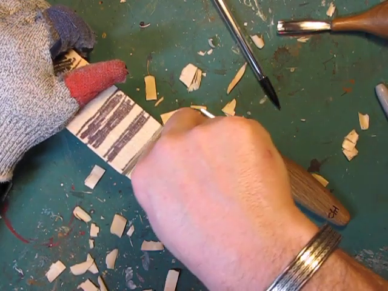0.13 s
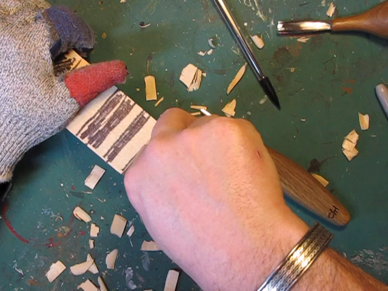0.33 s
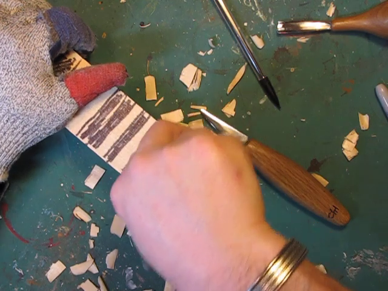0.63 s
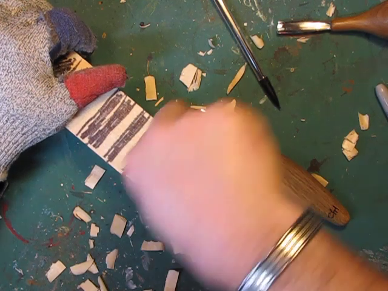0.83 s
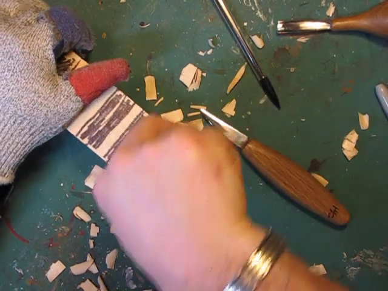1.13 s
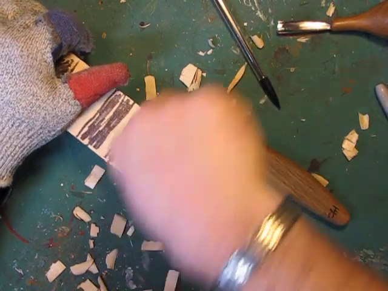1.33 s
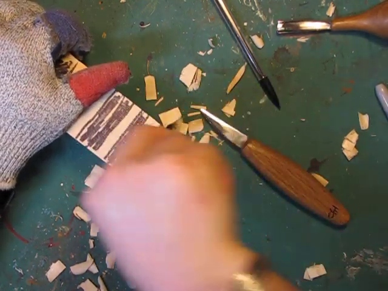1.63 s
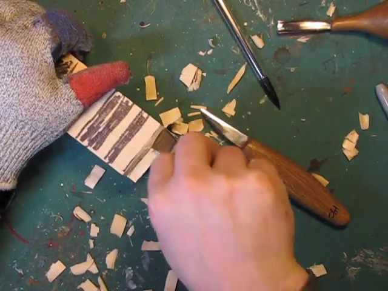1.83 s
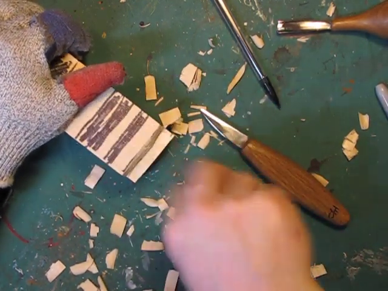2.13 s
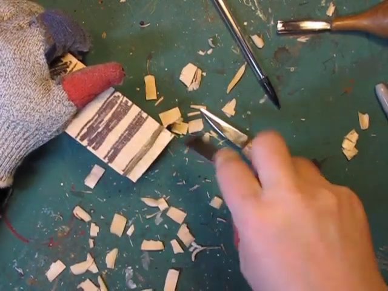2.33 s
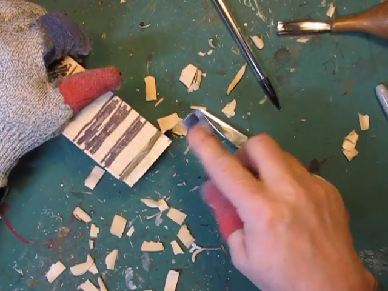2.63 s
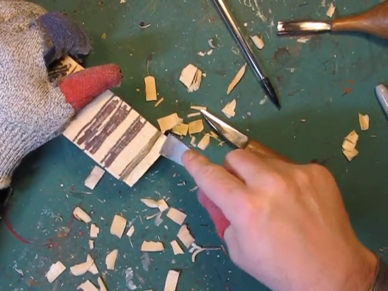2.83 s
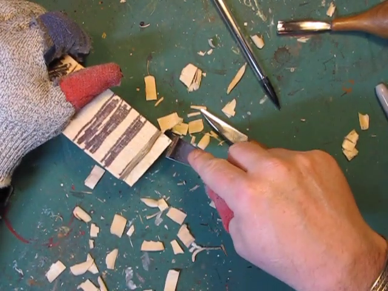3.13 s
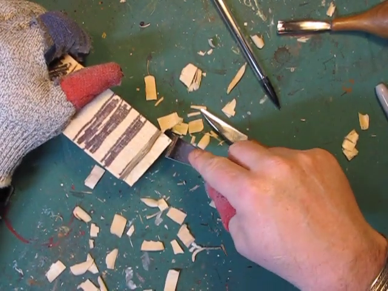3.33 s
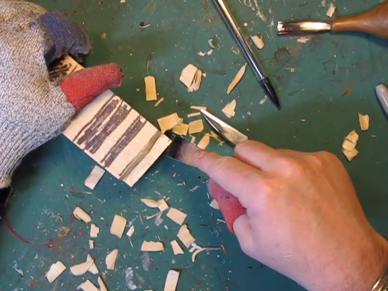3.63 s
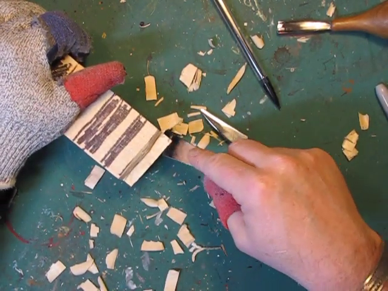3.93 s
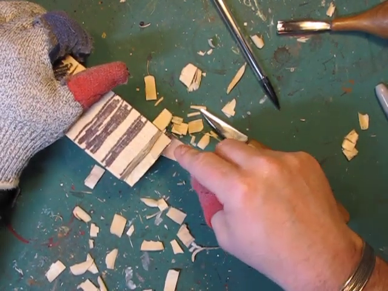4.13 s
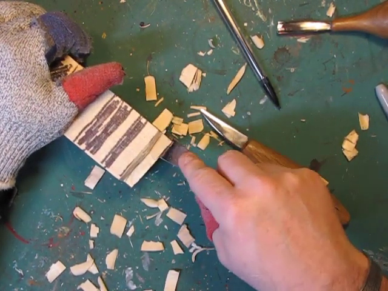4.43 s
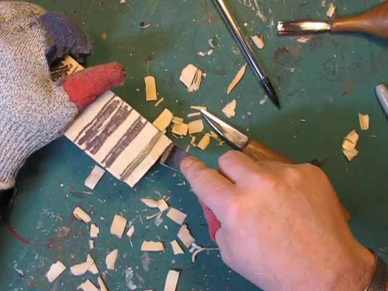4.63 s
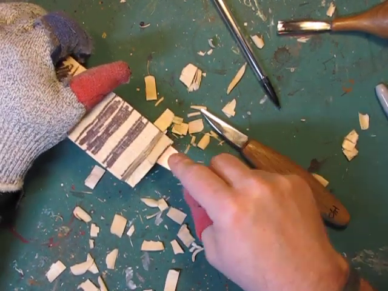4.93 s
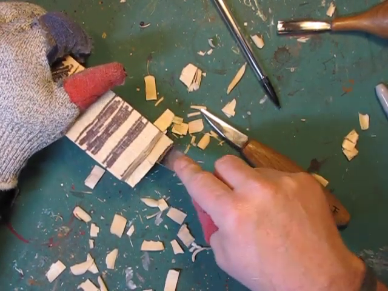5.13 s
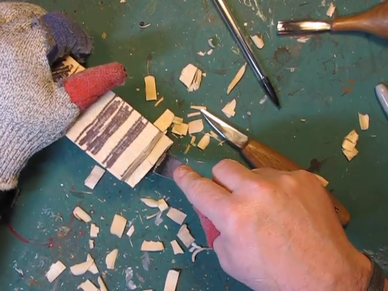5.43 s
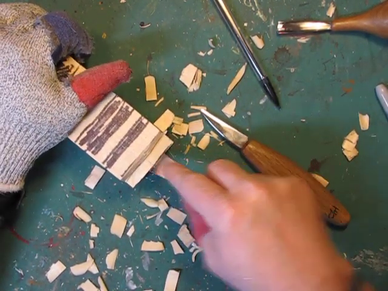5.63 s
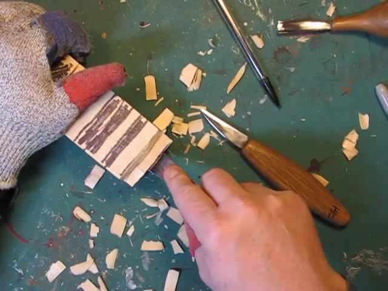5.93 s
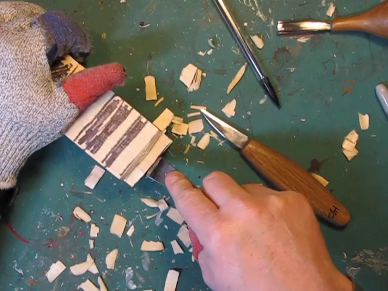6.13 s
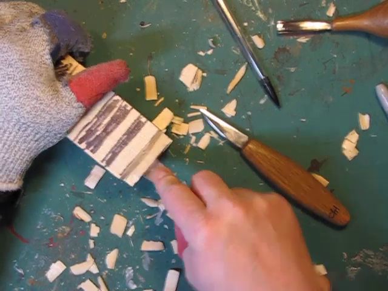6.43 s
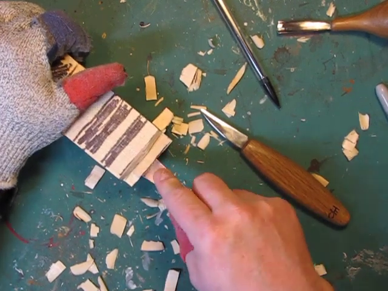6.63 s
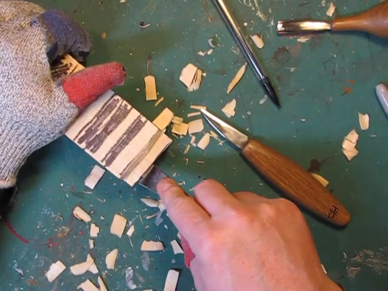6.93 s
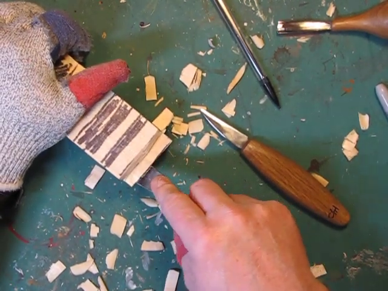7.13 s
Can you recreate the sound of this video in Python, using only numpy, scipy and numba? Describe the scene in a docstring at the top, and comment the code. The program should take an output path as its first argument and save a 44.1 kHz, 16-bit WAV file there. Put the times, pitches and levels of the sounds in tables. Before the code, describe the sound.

A hand gouge pares a wood block on a workbench in a small room, heard up close. It starts with a run of short, crackly rasps, small clicks and light knocks. Then the cuts spread out, with quiet scraping between sharp snaps as chips break loose, each big one thumping the bench. The tool clinks faintly now and then, and a last cut crackles at the end. A low hum runs underneath.

```python
"""Rasping cuts, sharp snaps and knocks over a low hum: a gouge pares a wood block on a bench in a small room.
Fibres tear in dense tiny clicks that resonate in block, chip and blade; chips snap loose.
Each jolt sets the bench top and frame ringing; the tool clinks and drags faintly.
A motor hums and winds down over mains hum and room air."""
import sys
import numpy as np
from scipy import signal
from scipy.fft import rfft, irfft, next_fast_len
from scipy.io import wavfile
from scipy.ndimage import uniform_filter1d
from numba import njit

SR = 44100
rng = np.random.default_rng(int(sys.argv[2]) if len(sys.argv) > 2 else 0)


def pcm_store(signal):
    """Save signal as 16-bit PCM."""
    levels = np.round(np.clip(np.atleast_2d(signal), -1, 1) * 32767)
    wavfile.write(sys.argv[1], SR, levels.astype(np.int16).T)


N = 321048

# bench top modes: (frequency [Hz], level [dB], t60 [s])
BENCH_MODES = [(95.5, -7.5, 0.12), (120, -3.5, 0.32), (157, -3.5, 0.057), (197.1, 0.5, 0.21),
               (236, -24.5, 0.061), (266.5, -17.5, 0.2), (331.6, -8, 0.12), (363, -12.5, 0.13),
               (439, -8, 0.055), (520, -7.5, 0.079), (684, 2.5, 0.012), (937, -1, 0.015),
               (1180, -1.5, 0.0084)]
# steel edge modes: (frequency [Hz], width [Hz], level [dB])
BLADE_MODES = [(4400, 400, -2), (8400, 600, 7), (11700, 700, 5), (15000, 900, -2)]
# how freely the steel rings: (time [s], level [dB])
BLADE_FREEDOM = [(0, -4), (1.9, -8), (2.4, -20), (4.74, -8), (4.79, -10.5), (5.4, -1), (6.3, 8),
                 (7.28, 2.5)]
BENCH_SPLIT_HZ, GRAINS_PER_S = 220, 6500


def amp(db):
    """Decibels to gain."""
    return 10 ** (np.asarray(db) / 20)


def unit_rms(x):
    """Scale to unit rms."""
    return x / np.sqrt(np.mean(x ** 2) + 1e-20)


def in_time(rows):
    """Table columns as curves over the samples."""
    times_s, *columns = np.transpose(rows)
    return np.array([np.interp(np.arange(N) / SR, times_s, c) for c in columns])


def at_hz(rows, hz, column=1):
    """One column of a spectrum table, on a log frequency axis."""
    rows = np.array(rows)
    return np.interp(np.log(hz), np.log(rows[:, 0]), rows[:, column])


def ring(x, hz, t60_s):
    """One mode: a unit click starts a decaying sine of height 1."""
    r, w = amp(-60 / (t60_s * SR)), 2 * np.pi * hz / SR
    return signal.lfilter([0, np.sin(w)], [1, -2 * r * np.cos(w), r * r], x + 1e-18)


def body(x, modes):
    """Parallel resonances with alternating signs."""
    out = 0
    for k, (hz, width_hz, db) in enumerate(modes):
        r = np.exp(-np.pi * width_hz / SR)
        b = [(1 - r * r) / 2, 0, (r * r - 1) / 2]
        a = [1, -2 * r * np.cos(2 * np.pi * hz / SR), r * r]
        out = out + (-1) ** k * amp(db) * signal.lfilter(b, a, x + 1e-18)
    return out


@njit
def two_pole_twice(x, feedback, r):
    """Time-varying band-pass, run twice for steep flanks."""
    for _ in range(2):
        y = np.zeros(len(x))
        for i in range(2, len(x)):
            y[i] = (1 - r[i] ** 2) / 2 * (x[i] - x[i - 2]) + feedback[i] * y[i - 1] - r[i] ** 2 * y[i - 2]
        x = y
    return x


def moving_resonance(x, hz, width_hz):
    """Resonance whose centre and width follow curves."""
    r = np.exp(-np.pi * width_hz / SR) * np.ones(N)
    return two_pole_twice(x, 2 * r * np.cos(2 * np.pi * hz / SR), r)


def grains(per_s, spread_db):
    """Random clicks of uneven size and sign over a little noise."""
    sizes = amp(spread_db * np.minimum(rng.exponential(1, N), 4)) * rng.choice([-1, 1], N)
    clicks = sizes * (rng.random(N) < per_s / SR)
    return unit_rms(clicks + 0.11 * rng.standard_normal(N))


def clumps(per_s, depth_db):
    """Uneven wood grain: a quickly wandering gain."""
    knots = rng.standard_normal(N // 100)
    return amp(depth_db * np.interp(np.arange(N) / SR * per_s, np.arange(len(knots)), knots))


def motor():
    """Two clean partials sink in pitch as the motor slows towards idle."""
    # (time [s], fundamental [dB rms], second partial [dB rms])
    partial_levels = [(0, -38.5, -42), (.5, -41, -79), (1.2, -46, -68), (2.0, -45.5, -57.5),
                      (2.4, -40, -61), (2.8, -43, -57), (3.6, -50, -56.5), (3.9, -47.5, -64),
                      (4.2, -76.5, -58.5), (5.5, -51, -55), (7.28, -65, -67)]
    start_hz, idle_hz, slowing_s = 93.1, 83.0, 3.5
    first_db, second_db = in_time(partial_levels)
    hz = idle_hz + (start_hz - idle_hz) * np.exp(-np.arange(N) / SR / slowing_s)
    phase = 2 * np.pi * np.cumsum(hz) / SR
    return np.sqrt(2) * (amp(first_db) * np.sin(phase) + amp(second_db) * np.sin(2 * phase))


def mains_hum():
    """Wavering hum: noise in very narrow bands."""
    # (frequency [Hz], width [Hz], level [dB rms])
    bands = [(122.2, 2.2, -52.5), (64, 1.54, -56), (232.5, 3.2, -65.5)]
    white = rng.standard_normal(N + SR)
    return sum(amp(db) * unit_rms(body(white, [(hz, width_hz, 0)])[SR:]) for hz, width_hz, db in bands)


def air():
    """Smooth room and preamp noise, alike left and right in the bass only."""
    # (frequency [Hz], relative density [dB])
    spectrum = [(20, 6), (45, -1), (62, -34.5), (80, -1), (150, -8), (250, -12.5), (500, -16),
                (1000, -23.5), (2000, -27.5), (4670, -31), (9000, -37), (16000, -44.5)]
    # (frequency [Hz], left-right coherence [0..1])
    coherence = [(100, 0.82), (290, 0.85), (640, 0.57), (1400, 0.18), (3100, 0.013)]
    rms_db = -47
    hz = np.maximum(np.arange(N // 2 + 1) * SR / N, 1)
    mid, side = rfft(rng.standard_normal((2, N))) * amp(at_hz(spectrum, hz))
    alike = np.clip(at_hz(coherence, hz), 0, 1)
    stereo = np.sqrt(1 + alike) * mid + np.sqrt(1 - alike) * side * [[1], [-1]]
    return amp(rms_db) * unit_rms(irfft(stereo, N))


def jolts():
    """The block hits the bench top softly and shudders; the shoved frame sways and rocks back once."""
    # (time [s], upper modes [dB], lower modes [dB], frame sway [dB])
    blows = [(0.118, -41, -42, -49), (.295, -21.5, -36.5, -60), (.427, -36.5, -35, -49),
             (.726, -33, -37.5, -64), (.947, -27.5, -51, -53), (1.126, -22, -39.5, -49),
             (1.607, -36, -57, -67), (1.731, -34.5, -36.5, -54), (2.106, -30, -37, -37),
             (2.133, -10.5, -19.5, -39), (2.447, -36, -40, -53), (2.809, -30.5, -26.5, -61),
             (3.869, -35, -51, -67), (3.989, -12, -28.5, -32), (4.705, -33, -43, -41),
             (4.817, -9, -17, -16), (5.654, -14, -24.5, -18), (5.663, -14.5, -27.5, -24),
             (6.082, -44.5, -44.5, -65), (6.403, -25.5, -21, -17.5), (6.413, -18.5, -29, -14.5),
             (6.697, -34.5, -39, -40), (6.786, -25, -37.5, -60), (7.171, -33, -59, -53),
             (7.206, -30, -47, -45)]
    # (frequency [Hz], level [dB], t60 [s])
    frame_modes = [(44.6, -0.5, 0.33), (53.3, -16, 0.12), (63, -15, 0.15), (85, -2, 0.037)]
    contact_hz, shudder_s, shove_s = 833, 0.045, 0.0018
    rebound_s, rebound_top_db, rebound_frame_db = .205, -30.5, -17.5
    upper, lower, frame = np.zeros((3, N + SR))
    t = np.arange(8000) / SR
    shove = t * np.exp(-t / shove_s)
    pole = np.exp(-2 * np.pi * contact_hz / SR)
    for time_s, upper_db, lower_db, sway_db in blows:
        force = 0.034 * rng.standard_normal(len(t)) * np.exp(-t / shudder_s)
        force[0] = 1
        force = signal.lfilter([(1 - pole) ** 2], [1, -2 * pole, pole ** 2], force)
        for delay_s, top_db, frame_db in [(0, 0, 0), (rebound_s, rebound_top_db, rebound_frame_db)]:
            at = round((time_s + delay_s) * SR)
            upper[at:at + len(t)] += amp(upper_db + top_db) * force
            lower[at:at + len(t)] += amp(lower_db + top_db) * force
            frame[at:at + len(t)] += amp(sway_db + frame_db + 8.0) * shove / shove.sum()
    out = sum(amp(db) * ring(frame[:N], hz, t60_s) for hz, db, t60_s in frame_modes)
    for k, (hz, db, t60_s) in enumerate(BENCH_MODES):
        drive = upper if hz > BENCH_SPLIT_HZ else lower
        out += (-1) ** k * amp(db) * ring(drive[:N], hz, t60_s)
    return out


def snaps():
    """A chip parts with a click and a dying flurry of splinters: heard bare and in block, chip and edge."""
    # (time [s], block [dB], chip [dB], bare crack [dB], block pitch [Hz], chip pitch [Hz])
    chips = [(0.2947, -16.5, -57, -67, 1530, 4100), (.4254, -57, -43, -51, 1760, 4100),
             (0.4933, -56, -71, -40.5, 1640, 3870), (0.5547, -25, -71, -42, 1760, 6700),
             (.7911, -21, -35, -39, 2350, 4380), (0.801, -35, -42, -45, 2480, 3660),
             (.8655, -17.5, -37, -64, 2250, 9300), (.9482, -19, -57, -51, 1980, 4010),
             (1.0015, -15, -51, -40, 1730, 6300), (1.0166, -10.5, -20, -49, 1960, 8600),
             (1.0328, -41, -8, -14, 2820, 9100), (1.1262, -11, -61, -60, 1540, 3970),
             (1.299, -30, -38, -62, 2470, 7100), (1.3147, -20, -40, -54, 2030, 4220),
             (1.375, -37, -44, -41, 2070, 4260), (1.4618, -52, -35, -55, 2350, 7460),
             (1.4717, -31.5, -24, -56, 2060, 8200), (1.4942, -32, -39, -52, 2050, 9520),
             (1.54, -43, -40, -30, 1900, 5060), (1.6126, -25, -45, -55, 1930, 3610),
             (1.67, -20.5, -46, -51, 1920, 3680), (1.6837, -22, -36, -45, 1820, 4130),
             (1.732, -26, -30, -31, 1800, 4560), (1.955, -45, -41.5, -67, 2050, 4560),
             (2.114, -32, -31, -51, 1780, 7500), (2.1346, -15, -15.5, -10, 2160, 7700),
             (2.516, -50, -61, -33, 1860, 8500), (2.5735, -32.5, -50, -51, 2250, 4230),
             (2.8103, -57.5, -32, -68, 2070, 4720), (2.987, -63, -35, -53, 1430, 6300),
             (2.993, -57, -33, -60, 1420, 5640), (3.011, -62, -36.5, -60, 1420, 4800),
             (3.02, -63, -41, -62, 1420, 4500), (3.9383, -44, -28.5, -57, 1980, 7500),
             (3.956, -52, -29, -60, 1600, 7350), (3.9837, -19, -21.5, -39, 1380, 11200),
             (3.992, -5.5, -43, -20, 1420, 4600), (4.003, -23, -18, -17, 1800, 4800),
             (4.102, -47, -39, -57, 1680, 3960), (4.817, -5, -10, -21, 1500, 4660),
             (5.219, -41, -43.5, -60, 2030, 5570), (5.6377, -55, -22, -25, 2320, 7500),
             (5.6517, -5, -8, -16, 2470, 8580), (5.6561, -5, -38, -6, 2280, 4580),
             (5.6627, -10, -35, -15, 1420, 4330), (5.9773, -54, -72, -46, 1950, 5700),
             (6.2072, -49, -63, -66, 1460, 5500), (6.3043, -44, -65, -38, 1950, 4300),
             (6.4045, -3.5, -35, -11, 2480, 5000), (6.4143, -11.5, -56, -10.5, 1420, 4370),
             (7.092, -30, -36, -47, 1940, 8500), (7.1253, -52, -29.5, -38, 2380, 5300),
             (7.1467, -28, -26, -34, 2350, 5200), (7.1742, -25, -19, -30, 2440, 8600),
             (7.198, -20, -23, -38, 2750, 8470), (7.2072, -36, -17, -43, 2700, 8600),
             (7.2127, -14.5, -6.5, -21.5, 2860, 8800), (7.2371, -36, -28, -21.5, 2470, 8280),
             (7.2675, -25, -21.5, -45, 1780, 5300)]
    flurry_s, rise_s, click_s, flick_db = 0.0026, 0.0027, .0009, 12
    t = np.arange(2000) / SR
    direct, room_paths = np.zeros(N + len(t)), np.zeros((3, N + len(t)))
    crack_band = signal.butter(1, [500.0, 7000.0], "band", fs=SR)
    for k, (time_s, block_db, chip_db, crack_db, block_hz, chip_hz) in enumerate(chips):
        pulse = 0.24 * rng.standard_normal(len(t)) * np.exp(-t / flurry_s) * (1 - np.exp(-t / rise_s))
        pulse[round(click_s * SR)] = -1
        impulse = np.sqrt(np.sum(pulse ** 2)) * (t == 0)   # equal energy, for the walls to blur
        drives = np.array([pulse, impulse])
        edge_db = chip_db + flick_db + np.interp(time_s, *np.transpose(BLADE_FREEDOM))
        modes = [(block_hz, 500, block_db + 19.5), (chip_hz, 0.19 * chip_hz, chip_db + 21.5)]
        modes += [(hz, width_hz, db + edge_db) for hz, width_hz, db in BLADE_MODES[1:]]
        near, far = body(drives, modes) + amp(crack_db + 15) * signal.lfilter(*crack_band, drives)
        at = round(time_s * SR)
        direct[at:at + len(t)] += near
        room_paths[k % 3, at:at + len(t)] += far
    return direct[:N], room_paths[:, :N]


def clinks():
    """The tool touches something and chatters: steel rings high, the handle knocks hollow."""
    # (time [s], initial level [dB rms], pitch [Hz], width [Hz], t60 [s])
    touches = [(.2957, -49, 3820, 180, .3), (.735, -33, 520, 60, .2), (.95, -27, 517, 60, .2),
               (2.106, -36, 1790, 150, .08), (7.178, -36, 520, 80, .25)]
    out, t = np.zeros(N), np.arange(SR // 4) / SR
    for time_s, db, hz, width_hz, t60_s in touches:
        chatter = unit_rms(body(rng.standard_normal(len(t)), [(hz, width_hz, 0)]))
        at = round(time_s * SR)
        out[at:at + len(t)] += (amp(db - 60 * t / t60_s) * chatter)[:N - at]
    return out


def tearing(block_gain, fibre_gain, block_hz):
    """Tearing fibres click into block, lifting chip and steel; the wood's pitch follows the cut depth."""
    block_width_hz, chip_width_hz, chip_pitch_ratio = 700, 2400, 3.12
    steel_db, = in_time(BLADE_FREEDOM)
    coarse = grains(GRAINS_PER_S, spread_db=1.0) * clumps(70.0, depth_db=4.0)
    fine = grains(GRAINS_PER_S, spread_db=4.5) * clumps(90.0, depth_db=5.0)
    # steady modes of the block: (frequency [Hz], width [Hz], level [dB])
    block_modes = [(1100, 600, -14), (3450, 900, -20), (4500, 700, -18)]
    width_scale = amp(-.25 * steel_db)   # a clean cut rasps on a narrower band
    rasp = moving_resonance(coarse, block_hz, block_width_hz * width_scale) / np.sqrt(width_scale)
    block = rasp + body(coarse, block_modes)
    chip = moving_resonance(fine, chip_pitch_ratio * block_hz, chip_width_hz)
    # reversed or shifted clicks stand for other fibres
    crackle = amp(-9.0) * signal.lfilter(*signal.butter(2, 4000.0, "high", fs=SR), fine[::-1])
    steel = amp(steel_db) * body(np.roll(fine, SR), BLADE_MODES)
    return block_gain * unit_rms(block) + fibre_gain * unit_rms(chip + crackle + steel)


def rubbing():
    """The hand rubs the bench: small clicks stir its upper modes, with shortened decay."""
    friction = grains(400.0, spread_db=-2.0)
    return unit_rms(sum(amp(db) * ring(friction, hz, .4 * t60_s)
                        for hz, db, t60_s in BENCH_MODES if hz > BENCH_SPLIT_HZ))


def strokes():
    """Each push of blade and hand swells and fades, driving the tearing and the rubbing."""
    # (peak time [s], rise [s], fall [s], block [dB], fibres [dB], rubbing [dB], block pitch [Hz])
    pushes = [(.31, .005, 0.17, -70, -75, -61, 1780), (.53, 0.011, .25, -57.5, -60, -49, 2200),
              (.64, 0.11, 0.05, -55.5, -63, -51.5, 2270), (.732, .01, 0.08, -65, -75, -37.5, 2000),
              (0.792, 0.022, 0.22, -37, -46.5, -39.5, 2130), (0.866, 0.0094, 0.31, -49, -57, -42, 2230),
              (0.953, 0.0092, 0.078, -38, -69, -28.5, 1720), (1.01, 0.054, .01, -42.5, -48, -47, 1760),
              (1.141, .01, 0.096, -40.5, -50, -43, 1490), (1.338, 0.07, 0.11, -42, -50.5, -42.5, 1995),
              (1.468, 0.0081, .2, -53, -62, -67, 2200), (1.542, .05, 0.072, -57, -48, -45.5, 1970),
              (1.606, 0.023, 0.083, -39, -55, -37.5, 1790), (1.692, 0.063, 0.13, -49, -46, -45, 2000),
              (2.13, 0.026, 0.012, -34.5, -27.5, -30.5, 1690), (2.519, 0.0039, 0.025, -44, -45, -41, 2160),
              (2.588, 0.15, 0.093, -61, -55, -43, 1870), (2.75, 0.35, 0.26, -60.5, -62, -54, 1670),
              (2.992, 0.044, 0.11, -81, -64, -50.5, 1680), (3.889, 0.02, 0.23, -67, -45, -41, 1890),
              (3.982, 0.034, 0.0057, -55, -32.5, -31, 2140), (4.328, 0.029, 0.27, -72, -65, -51, 1910),
              (4.53, 0.087, 0.065, -71, -57, -58, 2000), (4.712, 0.0047, 0.021, -71, -31.5, -38, 2373),
              (4.731, 0.041, 0.073, -57.5, -63, -37, 1770), (4.802, 0.12, .02, -56, -53.5, -51, 2100),
              (4.8135, 0.013, 0.02, -21, -20, -30, 2080), (5.16, 0.023, 0.14, -69.5, -71, -48, 2000),
              (5.48, 0.081, 0.26, -57, -72, -42, 1810), (5.563, .012, 0.13, -47, -76, -61, 2090),
              (5.631, 0.09, 0.012, -43, -40.5, -58, 2267), (6.306, 0.037, 0.056, -53, -73, -45, 1850),
              (6.375, 0.034, .02, -42.5, -53, -64, 2060), (6.394, 0.0087, 0.016, -24.5, -31, -33.5, 2250),
              (6.72, 0.31, 0.096, -60.5, -76.5, -49, 2000),
              (6.988, 0.028, 0.077, -46.5, -59.5, -43.5, 1930),
              (7.09, 0.043, 0.24, -51, -50.5, -50.5, 2350), (7.191, 0.023, 0.092, -68, -68, -39, 2520),
              (7.275, 0.11, .1, -46, -36.5, -48, 2480)]
    swell_db = 20   # gained over the rise, lost over the fall
    t, gains = np.arange(N) / SR, 0
    for peak_s, rise_s, fall_s, *levels_db, _ in pushes:
        away = np.where(t < peak_s, (peak_s - t) / max(rise_s, .002), (t - peak_s) / max(fall_s, .002))
        gains = gains + amp(levels_db)[:, None] * amp(-swell_db * np.minimum(away, 6))
    block_gain, fibre_gain, rub_gain = uniform_filter1d(gains, size=160)
    block_hz = in_time(pushes)[-1]
    return tearing(block_gain, fibre_gain, block_hz), rub_gain * rubbing()


def drag():
    """The shank sings faintly as the tool slides over the bench."""
    # (frequency [Hz], width [Hz], level [dB])
    shank_modes = [(2120, 260, -1), (3600, 330, -2), (4740, 350, -4), (5390, 300, 0)]
    start_s, hold_s, fade_s, rms_db = 2.62, .33, .05, -65
    t = np.arange(N) / SR - start_s
    contact = np.clip(np.minimum(t, hold_s - t) / fade_s + 1, 0, 1)
    return amp(rms_db) * contact * unit_rms(body(grains(GRAINS_PER_S, spread_db=3.0), shank_modes))


def mic_ports(x):
    """Sound reaches the two microphone ports with a frequency-dependent level and phase step."""
    # (frequency [Hz], left over right [dB], left lead [rad])
    steps = [(500, 0, 0), (1000, -1.6, -.2), (2200, -5, -.1), (4500, 1.3, -.7), (9000, 1.7, -.8),
             (14000, 1, -1.9)]
    size = next_fast_len(N + 1024)
    hz = np.maximum(np.arange(size // 2 + 1) * SR / size, 1)
    share = hz ** 2 / (hz ** 2 + 500 ** 2)   # long waves meet both ports alike
    left = amp(share * at_hz(steps, hz) / 2) * np.exp(.5j * share * at_hz(steps, hz, column=2))
    return irfft(rfft(x, size) * np.array([left, 1 / left]), size)[:, :N]


def room(paths):
    """Dense echoes as noise decaying per octave, new for each path; both ports share the bass."""
    # (frequency [Hz], t60 [s], relative level [dB])
    decay = [(200, 0.38, -1.5), (2000, 0.33, 1.5), (8000, 0.3, -4), (15000, 0.19, -4)]
    onset_s, shared_below_hz = 0.0025, 480.0
    t, echoes = np.arange(SR // 2) / SR, 0
    for low_hz in 80 * 2. ** np.arange(8):
        octave = signal.butter(2, [low_hz, min(2 * low_hz, .45 * SR)], "band", fs=SR, output="sos")
        band = signal.sosfilt(octave, rng.standard_normal((2, len(paths), len(t))))
        shared = 1 / (1 + (low_hz / shared_below_hz) ** 2)
        band = np.sqrt(shared) * band[0] + np.sqrt(1 - shared) * band
        t60_s, db = at_hz(decay, 1.4 * low_hz), at_hz(decay, 1.4 * low_hz, column=2)
        echoes = echoes + band * amp(db - 60 * t / t60_s)
    echoes *= 1 - np.exp(-(t / onset_s) ** 2)
    echoes = unit_rms(echoes) / np.sqrt(len(t))
    size = next_fast_len(N + len(t))
    return irfft(np.sum(rfft(paths, size) * rfft(echoes, size), axis=1), size)[:, :N]


def scene():
    """Block, tool and bench in the room, over motor, hum and air."""
    cut, rub = strokes()
    cracks, room_paths = snaps()
    bench = jolts() + rub
    room_paths[0] += amp(-1.5) * cut + amp(-5.5) * bench
    direct = mic_ports(cut + cracks + clinks() + drag() + bench)
    return direct + amp(-9) * room(room_paths) + motor() + mains_hum() + air()


def record(dry):
    """The microphone drops the deepest bass and rounds peaks near full scale; the top is cut steeply."""
    low_cut_hz, stopband_hz = 38.0, 16500
    thin = signal.sosfilt(signal.butter(3, low_cut_hz, "high", fs=SR, output="sos"), dry)
    rounded = thin / (1 + thin ** 4) ** .25
    return signal.sosfilt(signal.cheby2(16, 60, stopband_hz, fs=SR, output="sos"), rounded)


dry = scene()
out = record(dry)
pcm_store(out)
```